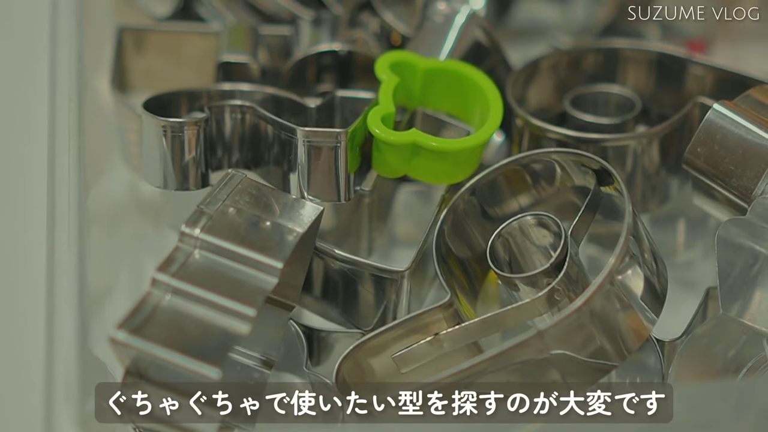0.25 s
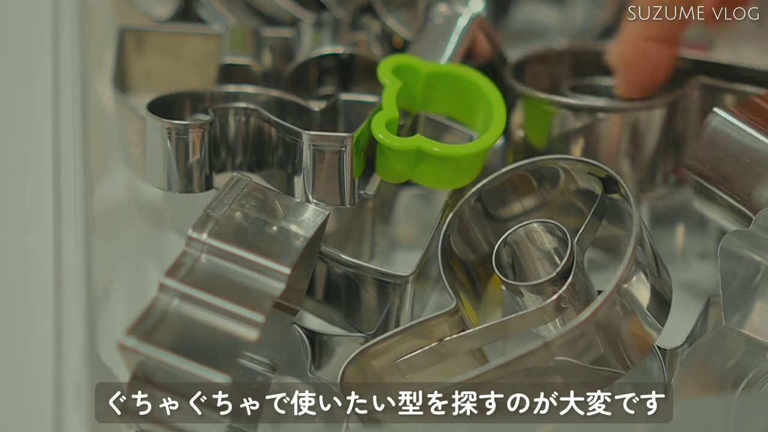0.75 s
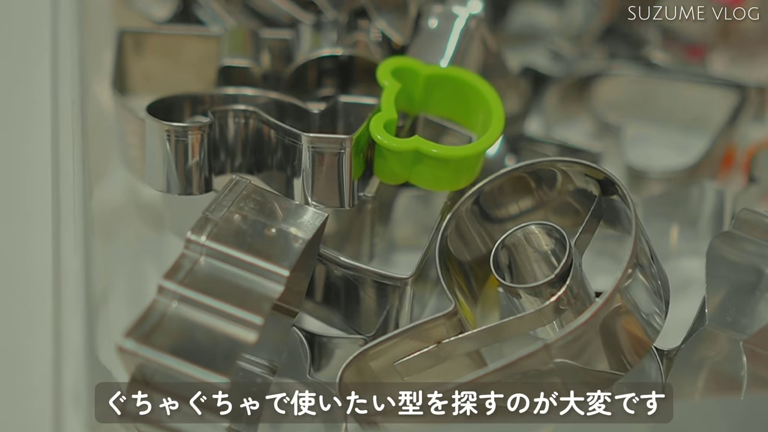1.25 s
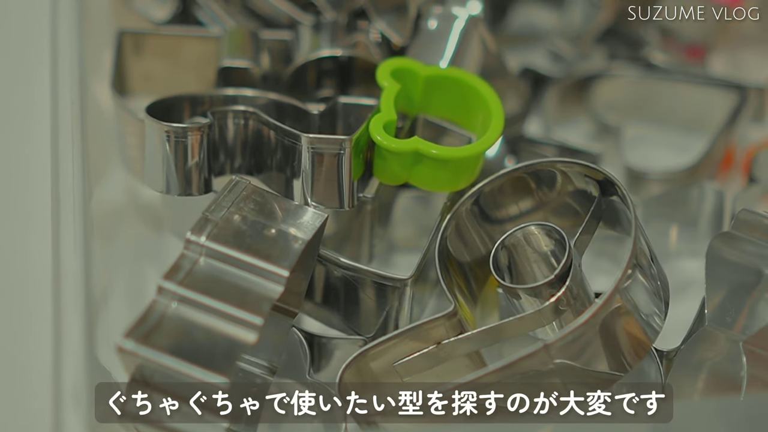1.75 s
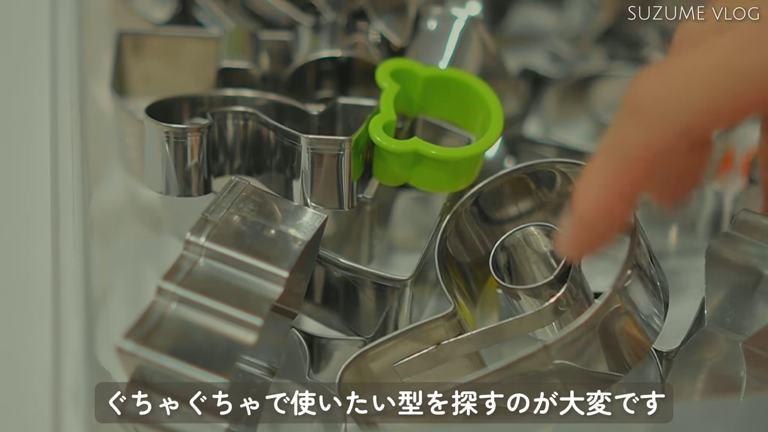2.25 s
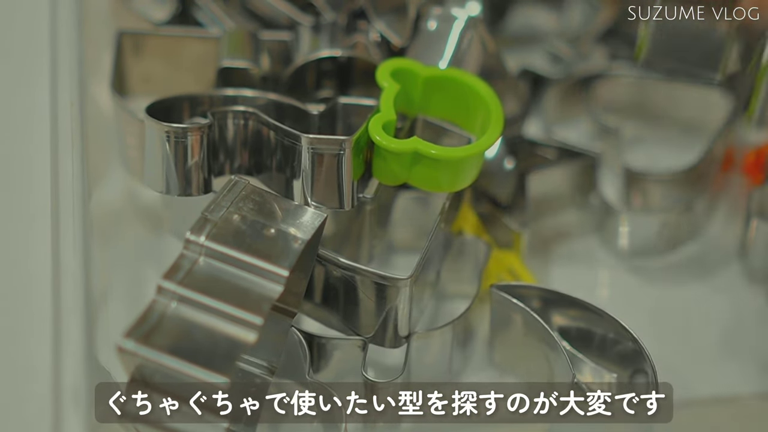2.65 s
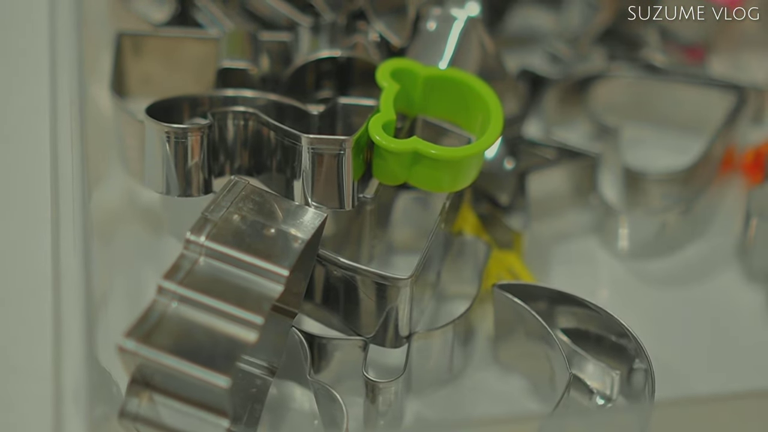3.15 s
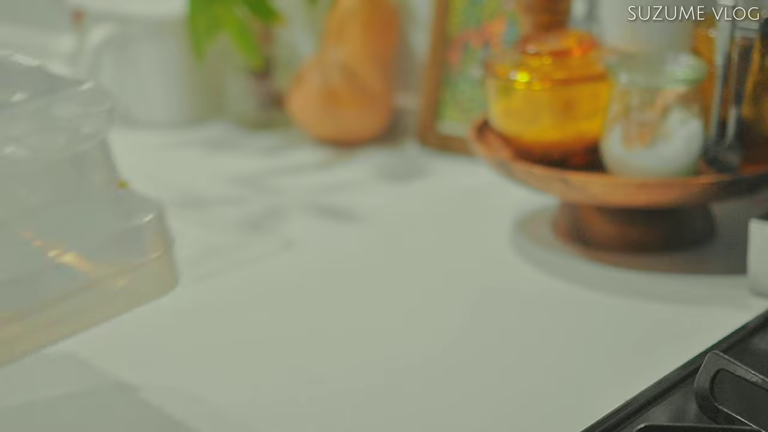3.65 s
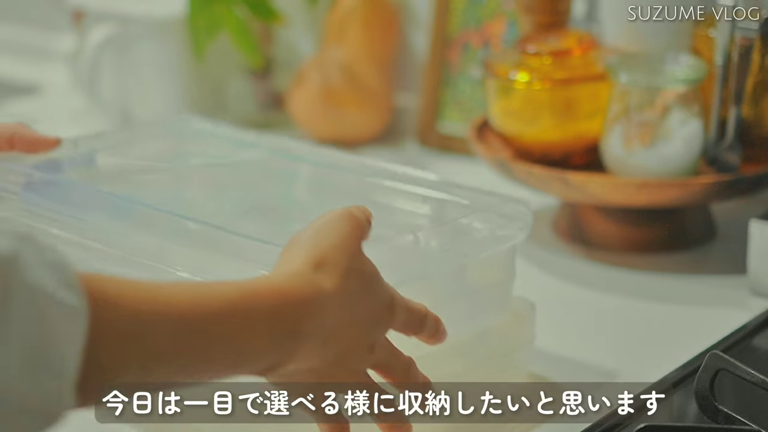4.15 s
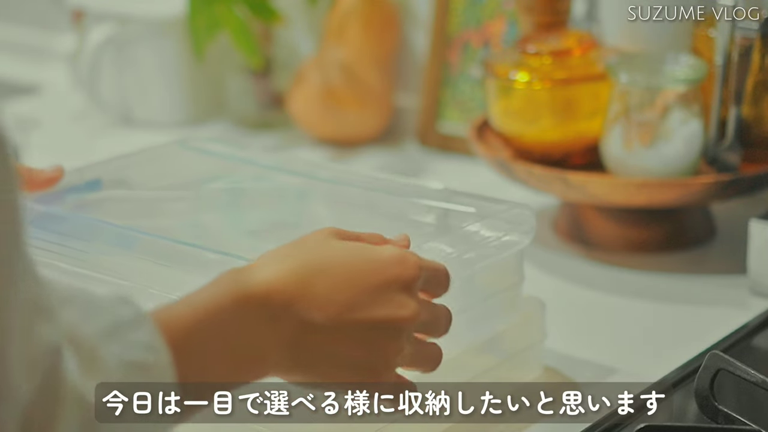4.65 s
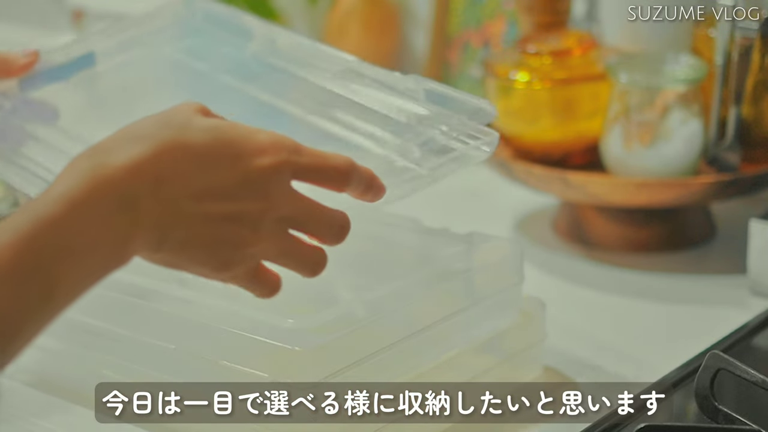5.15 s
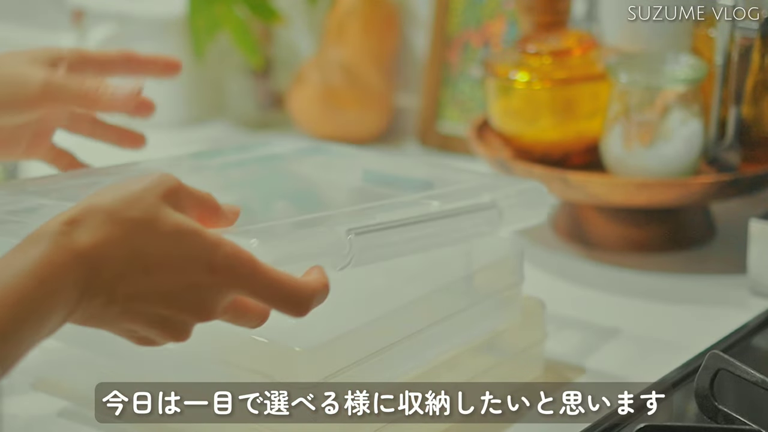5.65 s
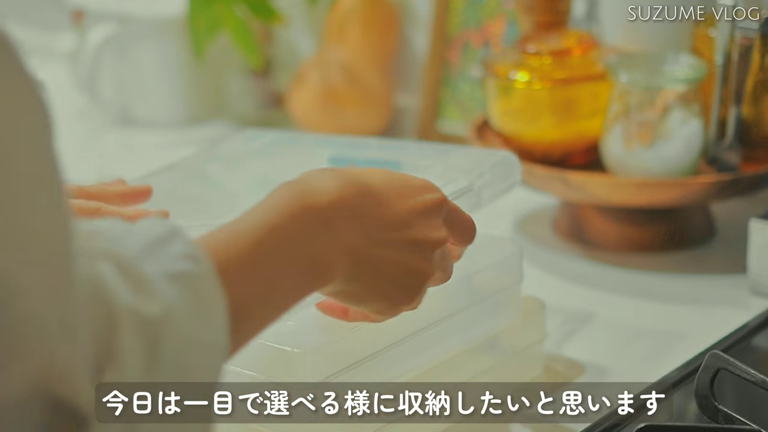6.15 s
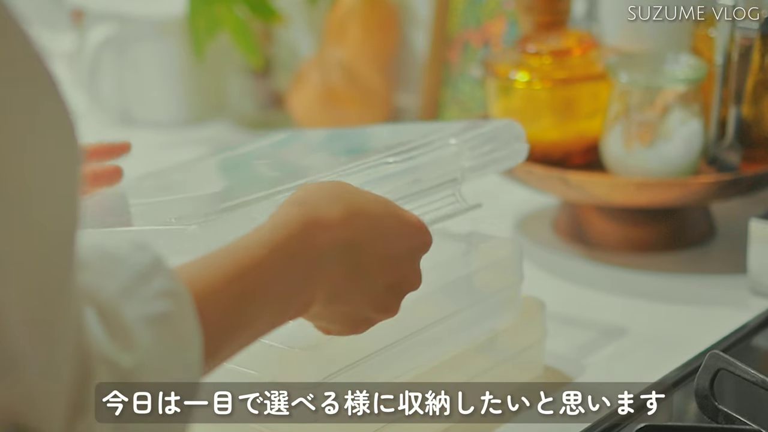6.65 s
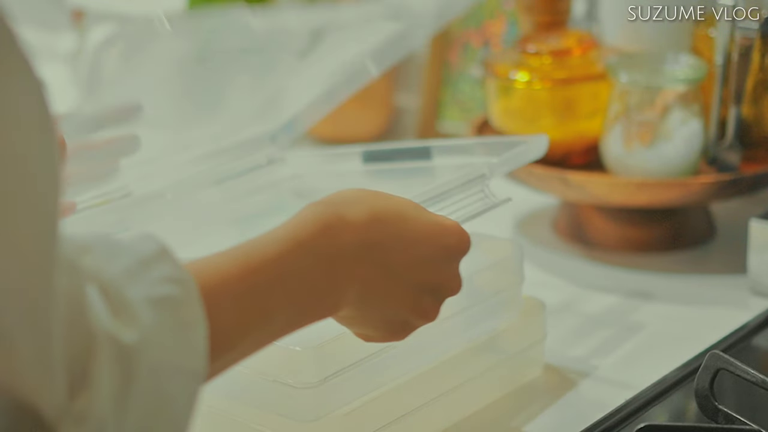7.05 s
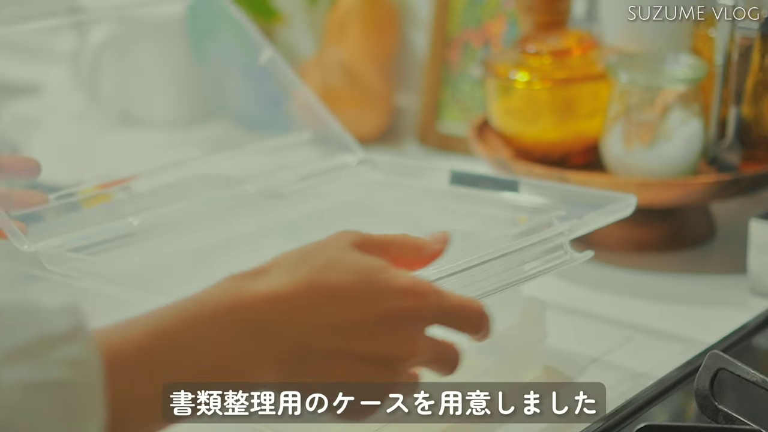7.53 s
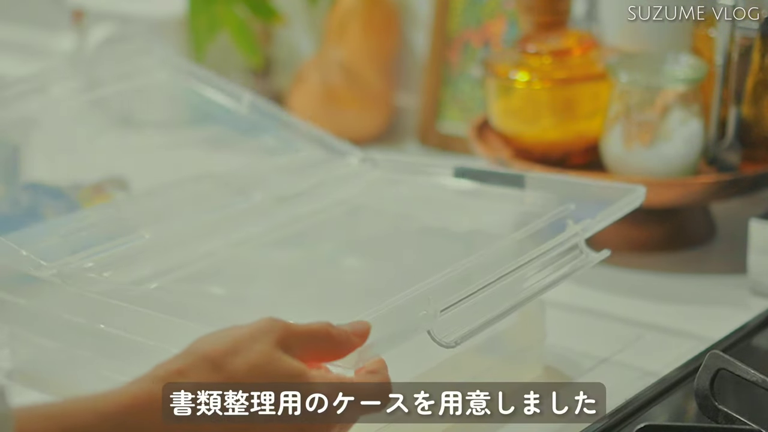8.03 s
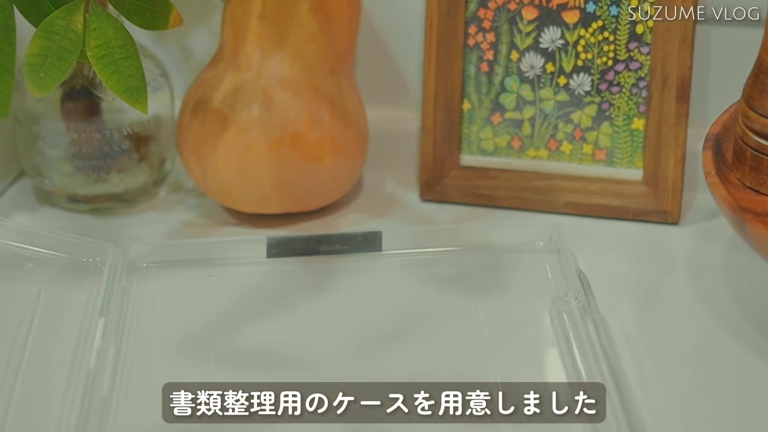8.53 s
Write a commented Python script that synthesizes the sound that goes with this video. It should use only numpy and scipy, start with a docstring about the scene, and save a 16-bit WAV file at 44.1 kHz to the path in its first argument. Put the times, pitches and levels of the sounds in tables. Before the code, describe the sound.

Bright metallic clatter of cookie cutters being picked from a heap, followed by hollow plastic case knocks, clicks and scuffs in a quiet kitchen.

```python
"""Steel clinks and jangles, then plastic knocks and snaps, then a quiet room: three scenes joined in a small hard kitchen.
A hand lifts thin steel cookie cutters out of a tangled heap in a plastic box; flat plastic cases are set down
on the counter, unstacked, unlatched and opened. Each contact makes a crack, dying noise bands and ringing modes.
The room is steady filtered noise, with two faint sines in the last scene; a thin microphone has little bass."""
import sys
import numpy as np
from scipy import signal
from scipy.io import wavfile
from scipy.ndimage import uniform_filter1d

SR = 44100
rng = np.random.default_rng(int(sys.argv[2]) if len(sys.argv) > 2 else 0)


def wav_record(signal):
    """Record a signal, one row per channel, as 16-bit PCM in the file named by sys.argv[1]."""
    frames = np.transpose(np.atleast_2d(signal))
    bounded = np.clip(frames, -1, 1)
    # unit amplitude maps onto the largest positive 16-bit level
    quanta = np.round(bounded * 32767).astype(np.int16)
    wavfile.write(sys.argv[1], SR, quanta)


def field_ratio(decibels):
    """Amplitude ratio for a level in dB (20 dB per decade); scalars and array-likes work."""
    return 10 ** (np.asarray(decibels, dtype=float) / 20)


N = 387618

# Steel collisions. Each row: time in seconds, strength in dB, lows re mids in dB, highs re mids in dB, note in Hz.
CLINKS = [(0.1353, -34, 5, -20, 3470), (0.2443, -36, -6, -25, 3420), (0.3204, -10, -25, -9, 5060),
          (0.355, -9, -38, -12, 4920), (0.3873, -17, -25, 6, 12200), (0.455, -14, -21, 2, 12100),
          (0.5198, -13.5, 2, -27, 5700), (0.5562, -10, -17, -32, 5500), (0.7123, -16, -4.5, 1, 6650),
          (0.7595, -7, -5, -19, 4840), (0.7926, -7, -46, -15, 5200), (0.8402, -8, -30, -17, 4750),
          (0.8722, -3.5, -3, -5.5, 7640), (0.9083, -12.5, -14, -1, 8900), (0.9496, -8, -14, -16, 3450),
          (0.965, -7, -6.5, -2, 4670), (1.0109, -9, -4, -11, 4750), (1.0303, -5.5, -14, -9, 5090),
          (1.132, -9, -14, -32, 4500), (1.1673, -11.5, -11.5, 2, 4650), (1.1954, -19.5, -24.5, 11.5, 11200),
          (1.2207, -13.5, -5, -41, 2064), (1.2414, -12.5, -3, -27, 2155), (1.287, -15.5, -10, -23, 1986),
          (1.5661, -20, -33, -18, 5650), (1.6132, -27.5, -15, -10, 5570), (1.6661, -28, -28, -10, 5800),
          (1.6806, -16.5, -10, -1.5, 5660), (1.6995, -9, -5.5, -8, 2196), (1.7235, -10.5, -22, -1, 4940),
          (1.759, -14, -5, 4, 6050), (1.8344, -10.5, -12, 1, 6420), (1.8894, -12.5, -6, -12, 6000),
          (1.907, -9.5, -1.5, -7, 4940), (2.0666, -27.5, -9, -6, 5040), (2.3491, -18, -9.5, -11, 5360),
          (2.3727, -11.5, -21, -19, 3990), (2.3814, -9, -13, -5, 4900), (2.4372, -3.5, -19, -21, 4156),
          (2.4844, -2.5, -36, -42, 4200), (2.5355, -3.5, -11.5, -14, 4090),
          (2.597, -7.5, -10.5, -8.5, 4210), (2.7125, -9.5, -23, -21, 3830), (2.72, -3.5, -15.5, -17, 5010),
          (2.7461, -12.5, -17, -1.5, 11700), (2.8481, -10.5, -17, -10.5, 5240),
          (2.9228, -2.5, -53, -12, 5800), (2.9465, -11.5, 2.5, -5.5, 2435), (2.9672, -6, -26, -9, 6500),
          (2.9907, -2.5, -35, -8, 5710), (3.043, 0.5, -44, -9, 13600), (3.0709, -3, -41, -12, 6790),
          (3.0983, -9, -33, -6, 4040), (3.1196, -6, -42, -0.5, 4110), (3.1487, -13.5, -41, 0.5, 7180),
          (3.2505, -13.5, -2.5, -2.5, 6460), (3.3026, -10, -17, -10, 2374), (3.3362, -13, -33, -6, 5230),
          (3.3566, -14, -12, 3.5, 6400)]
# Hand drags through the heap. Each row: start in seconds, length in seconds, first relative level in dB,
# last relative level in dB, brightness in dB.
STIRS = [(0.0, 0.014, -24, -21, -2.5), (0.317, 0.26, -12, -12, 0), (0.712, 0.01, -21, -26, 9),
         (0.757, 0.38, -11, -18, 2), (1.166, 0.033, -17, -9.5, 4.5), (1.222, 0.17, -42, -39, -6),
         (1.507, 0.06, -43, -33, 1), (1.655, 0.029, -30, -21.5, 8), (1.682, 0.11, -9.5, -16.5, 0.5),
         (1.838, 0.1, -10, -17.5, 1), (2.306, 0.046, -47, -34, -11), (2.371, 0.016, -27, -13, 4),
         (2.438, 0.18, -14.5, -18.5, 4), (2.703, 0.01, -17, -23, 0), (2.749, 0.1, -30, -25.5, -3.5),
         (2.944, 0.19, -15, -11, 0), (3.356, 0.03, -12.5, -15, 5.5)]
# Steel rattle colour in dB, settling in dB per second once let go, dulling in dB per dB settled.
STEEL_RATTLE = dict(lows_db=-8, highs_db=-6.5, settle_db_per_s=443, dulls=0.43)
# Modes of the cutters lifted before the pause. Each row: frequency in Hz, width in Hz, relative level in dB.
EARLY_CUTTER_MODES = [(1080, 36, -17.5), (1450, 630, -3), (2430, 43, 4), (2940, 32, -10), (3470, 380, 5.5),
                      (3730, 80, 4.5), (4740, 57, 8), (5570, 65, 8), (6180, 45, 1), (6500, 90, 6.5),
                      (7300, 180, 2.5), (8200, 27, -5), (9200, 300, -3), (11200, 99, -5), (11800, 100, 1.5),
                      (12200, 54, 1), (13900, 78, 3), (14200, 70, -1), (15200, 87, 2.5)]
# Modes of the cutters lifted after the pause. Each row: frequency in Hz, width in Hz, relative level in dB.
LATE_CUTTER_MODES = [(3320, 45, -14), (4050, 43, -6), (4900, 79, -24), (5700, 110, 4), (6400, 77, -13),
                     (6790, 91, -0.5), (8600, 49, -6), (8700, 64, -7), (9350, 55, -20), (9540, 270, -10),
                     (10100, 63, -18), (10900, 42, -39), (10900, 68, -17), (11500, 34, -39),
                     (11700, 46, -12), (12100, 170, -30), (12100, 36, -13), (12500, 40, -20),
                     (13700, 29, -13), (13600, 90, -24), (14700, 130, -20), (14370, 90, -14)]
# Modes of a cutter hanging free in the fingers. Each row: frequency in Hz, width in Hz, relative level in dB.
HELD_CUTTER_MODES = [(4140, 9, -17.5), (5800, 11, -16.5), (7060, 8.9, -19), (13390, 20, -32)]
# Modes of the plastic box. Each row: frequency in Hz, width in Hz, relative level in dB.
BOX_MODES = [(183, 10.7, -47.5), (320, 52, -37)]
# Span in which the held cutter is struck: start in seconds, end in seconds.
HELD_SPAN_S = [2.92, 3.16]
PAUSE_S = 2.27
# Spectrum of the steel. Each row: frequency in Hz, relative density in dB per Hz.
STEEL_SPECTRUM = [(71, -74), (120, -52), (177, -40), (241, -53), (295, -33), (463, -14), (643, -22.5),
                  (1430, -5), (2750, -7.5), (4060, -4.5), (10400, -9), (12300, -12), (16000, -24)]
# Decay of the dense steel modes. Each row: frequency in Hz, T60 in seconds.
STEEL_T60 = [(200, 0.29), (1000, 0.24), (4000, 0.24), (14000, 0.17)]

# Plastic knocks and snaps. Each row: time in seconds, strength in dB, lows re mids in dB, highs re mids in dB,
# note in Hz.
KNOCKS = [(3.484, -38.5, -34, -8, 1350), (3.8086, -40, -17, -19, 610), (4.13, -43, -18, -2, 3210),
          (4.2034, -11.5, -35, -10.5, 1333), (4.3529, -28.5, -24, -8, 1280), (4.4694, -34, -25, -12, 980),
          (4.5944, -40, -19, 0.5, 1260), (4.6766, -32, -24, -17, 920), (4.8584, -28.5, -25, -46, 1340),
          (4.8876, -33, -13, -22, 725), (4.9412, -19.5, -14.5, -19, 1010), (5.1954, -41, -8, -33, 600),
          (5.3921, -11, -30, -9.5, 1320), (5.4591, -6.5, -40, -27, 1340), (5.4744, -13, -27.5, -26, 1380),
          (5.6462, -2, -23.5, -16.5, 1630), (5.6886, -8.5, -31, -35, 1770), (5.7494, -17.5, -16, -25, 830),
          (5.8037, -17.5, -10.5, -8.5, 1280), (5.8343, -21, -25, -20, 1350), (5.878, -18.5, -14, -8.5, 880),
          (5.9733, -29, -18, -15, 1330), (6.0176, -33.5, -12, -9, 1290), (6.0544, -38.5, 0, -7, 654),
          (6.2312, -37, -11, -48, 1340), (6.3365, -30.5, -24, 2, 825), (6.3593, -31, -27, -35, 1450),
          (6.3974, -33.5, -23, -38.5, 860), (6.4914, -19, -29, -34, 1020), (6.5116, -22, -21, -5, 1630),
          (6.5645, -31, -15, -39, 644), (6.6055, -26, -30, -15, 1410), (6.6977, -13, -27, -26, 1374),
          (6.7594, -16, -16.5, -11.5, 872), (6.8273, -15.5, -35, -31, 1354), (6.7474, -32, -18, -19, 1340),
          (6.8986, -24, -30, -12, 1440), (6.9244, -23.5, -16, -23, 890), (7.1967, -36, -27, -15, 930),
          (7.225, -36.5, -9, -16, 855), (7.3633, -38.5, -19, -28, 1480), (7.6043, -35.5, -8, -10, 1450),
          (7.675, -30.5, -28, -16, 1260), (7.8253, -35, -23, -18, 980), (7.8421, -25.5, -28.5, -37, 1700),
          (8.0568, -38, -25, -37, 888), (8.2142, -28, -34, -12, 1270), (8.31, -31, -21, -8, 1460)]
# Scuffs of hands and cases. Each row: start in seconds, length in seconds, first relative level in dB,
# last relative level in dB, brightness in dB.
SCUFFS = [(4.21, 0.071, -22, -35, -2), (4.312, 0.09, -36.5, -36, -4), (4.396, 0.28, -37, -46, -12),
          (4.93, 0.2, -50, -46.5, -10), (5.66, 0.09, -14, -35.5, -2.5), (5.793, 0.18, -43, -42.5, 4),
          (6.499, 0.0065, -21, -28, -0.5), (6.525, 0.01, -26, -35, 0), (6.684, 0.23, -37.5, -52, -9),
          (7.228, 0.01, -38, -40.5, -7.5), (7.417, 0.28, -59, -45, 5), (7.847, 0.0077, -28.5, -34, 3),
          (8.148, 0.03, -47, -52, 10), (8.222, 0.13, -44, -42, -2.5), (8.306, 0.031, -45, -45.5, 0)]
# Plastic rattle colour in dB, settling in dB per second after a scuff, dulling in dB per dB settled.
PLASTIC_RATTLE = dict(lows_db=-14, highs_db=-6.5, settle_db_per_s=174, dulls=0.11)
# Modes of the case shells. Each row: frequency in Hz, width in Hz, relative level in dB.
CASE_MODES = [(860, 66, 2), (1340, 76, -37), (1630, 40, 1.5), (2670, 180, -41), (3440, 110, -2),
              (4400, 84, -5), (5090, 47, -37), (5710, 50, -4)]
# Modes of the worktop. Each row: frequency in Hz, width in Hz, relative level in dB.
COUNTER_MODES = [(201, 35, -30.5), (313, 53, -22)]
# Spectrum of the plastic. Each row: frequency in Hz, relative density in dB per Hz.
PLASTIC_SPECTRUM = [(71, -65), (120, -55), (192, -17), (370, -22), (535, -3), (874, -2.5), (1120, -2.5),
                    (1650, -1.5), (2530, -2), (4500, -4.5), (7200, -12), (15000, -21), (16000, -39)]
# Decay of the dense plastic modes. Each row: frequency in Hz, T60 in seconds.
PLASTIC_T60 = [(200, 0.06), (1000, 0.12), (4000, 0.1), (14000, 0.061)]

# Stereo likeness of struck things and room tail. Each row: frequency in Hz, left-right correlation.
STRUCK_LIKENESS = [(60, 0.985), (180, 1), (550, 0.98), (1650, 0.97), (4970, 0.78), (15000, 0.093)]
# Stereo likeness of the hiss. Each row: frequency in Hz, left-right correlation.
HISS_LIKENESS = [(60, 0.92), (240, 0.81), (950, 0.63), (3770, 0.5), (15000, 0.061)]
# Stereo balance. Each row: frequency in Hz, left minus right in dB.
BALANCE = [(60, 6), (180, 1.5), (550, 1.5), (1650, 1), (4970, 0), (15000, 0)]
# Decay of the kitchen. Each row: frequency in Hz, T60 in seconds.
ROOM_T60 = [(200, 0.46), (1000, 0.45), (4000, 0.46), (14000, 0.36)]
# Faint appliance tones. Each row: frequency in Hz, relative level in dB.
WHINES = [(3250, -66), (14800, -74)]
# Spectrum of the hiss. Each row: frequency in Hz, relative density in dB per Hz.
HISS_SPECTRUM = [(24, -71), (40, -39), (167, -21), (199, -19), (283, -11.5), (422, -6.5), (479, -5),
                 (1950, -0.5), (2150, 1.5), (2570, -8), (3300, -4), (14800, -18.5), (16000, -24)]
# Hiss level of each scene in dB.
HISS_DB = [-48, -47.5, -48.5]
# Gain of each scene's action in dB, added on the left and taken off on the right.
SCENE_LEAN_DB = [-0.93, -0.2, .6]
# Times of the two joins in seconds.
JOINS_S = [3.374, 8.354]
FADE_OUT_S, FADE_IN_S = 0.0013, 0.027
BAND_EDGES_HZ = 30 * 2 ** np.arange(0, 9.3, .5)   # half octaves


def cutters():
    """Thin steel bands jostle: clinks over a fast uneven rattle; the box booms faintly under them."""
    touch = contacts(CLINKS, STIRS, per_s=380, spread_db=3.0, rattle_db=-11, **STEEL_RATTLE)
    pivots_hz = [900, 4000, 12000]
    time_s = touch[0] / SR
    late = time_s > PAUSE_S
    free = (time_s > HELD_SPAN_S[0]) & (time_s < HELD_SPAN_S[1])

    early_touch = [column[~late] for column in touch]
    late_touch = [column[late] for column in touch]
    free_touch = [column[free] for column in touch]
    early = ringing(early_touch, EARLY_CUTTER_MODES, pivots_hz, luck_db=5, scatter_db=0.5)
    late_ring = ringing(late_touch, LATE_CUTTER_MODES, pivots_hz, luck_db=8, scatter_db=2.5)
    held = ringing(free_touch, HELD_CUTTER_MODES, pivots_hz, luck_db=2, scatter_db=1)

    heap = scattered_modes(STEEL_SPECTRUM, count=140, low_hz=892.5, high_hz=15825,
                           low_width_hz=45, high_width_hz=85)
    jingle = ringing(touch, heap, pivots_hz, luck_db=9, scatter_db=2.0)
    box = ringing(touch, BOX_MODES, pivots_hz, luck_db=3, scatter_db=.3)
    body = clatter(touch, STEEL_SPECTRUM, STEEL_T60, pivots_hz, rise_cycles=8.5, crack_db=16, colour_db=4)
    notes = pings(CLINKS, t60_s=0.069, level_db=-6.5, high_db=-3, high_hz=6600, split=0.003)

    rings = field_ratio(-21) * jingle + field_ratio(-20.5) * early + field_ratio(-17) * late_ring + held + notes
    return field_ratio(-4.5) * body + radiated(rings, low_hz=640) + radiated(box, low_hz=143)


def cases():
    """Stiff plastic shells knock, snap and scuff; the worktop thuds under them."""
    touch = contacts(KNOCKS, SCUFFS, per_s=700, spread_db=2.5, rattle_db=-11.5, **PLASTIC_RATTLE)
    pivots_hz = [380, 2000, 8000]
    body = clatter(touch, PLASTIC_SPECTRUM, PLASTIC_T60, pivots_hz, rise_cycles=1.0, crack_db=17, colour_db=2.5)
    shell = ringing(touch, CASE_MODES, pivots_hz, luck_db=4, scatter_db=.8)
    panels = scattered_modes(PLASTIC_SPECTRUM, count=40, low_hz=484, high_hz=6100,
                             low_width_hz=42, high_width_hz=86)
    hollow = ringing(touch, panels, pivots_hz, luck_db=5, scatter_db=1.5)
    counter = ringing(touch, COUNTER_MODES, pivots_hz, luck_db=3, scatter_db=.3)
    notes = pings(KNOCKS, t60_s=0.076, level_db=-10.5, high_db=-3, high_hz=2500, split=0.15)

    rings = field_ratio(-15.0) * shell + field_ratio(-20.5) * hollow + notes
    return field_ratio(3) * body + radiated(rings, low_hz=437) + radiated(counter, low_hz=140)


def contacts(hits, strokes, per_s, spread_db, rattle_db, lows_db, highs_db, settle_db_per_s, dulls):
    """Listed hits plus random rattle that dies and dulls after each stroke: (sample, dB, lows dB, highs dB)."""
    chance = rng.random(N)
    size_db = spread_db * np.minimum(rng.exponential(1, N), 4)
    at = np.flatnonzero(chance < per_s / SR)

    start, length, first, last, bright = np.transpose(strokes)[:, :, None]
    since = at / SR - start
    settled = settle_db_per_s * np.maximum(since - length, 0)
    progress = np.clip(since / np.maximum(length, 1e-3), 0, 1)
    level = first + (last - first) * progress - settled
    level = np.where(since < 0, -np.inf, level)

    # the loudest stroke drives each rattle contact
    loudest = level.argmax(axis=0), np.arange(len(at))
    tilt = (bright - dulls * settled)[loudest]
    stroke_db = level[loudest]
    rattle = np.transpose([at, stroke_db + rattle_db + size_db[at], lows_db - tilt, highs_db + tilt])
    rattle = rattle[stroke_db > -70]   # fainter ones are dropped

    blows = [(round(s * SR), db, lows, highs) for s, db, lows, highs, _ in hits]
    at, *columns = np.transpose([*rattle, *blows])
    return at.astype(int), *columns


def tilted(touch, hz, pivots_hz):
    """Click train as felt at one frequency: each contact's own lows and highs weight it away from the mids."""
    at, level, lows, highs = touch
    place = np.interp(np.log(hz), np.log(pivots_hz), [-1, 0, 1])
    side = lows if place < 0 else highs
    train = np.zeros(min(N, at.max() + SR))
    train[at] = field_ratio(level + abs(place) * (side - np.median(side)))
    return train


def clatter(touch, spectrum, t60s, pivots_hz, rise_cycles, crack_db, colour_db):
    """A bare crack, then modes too dense to tell apart: noise that dies by band, coloured anew by each contact."""
    out = np.zeros((2, N))
    flip = rng.choice([-1, 1], N)
    luck = field_ratio(colour_db * rng.standard_normal(N))
    for k, (hz, band, noise) in enumerate(noise_bands(STRUCK_LIKENESS)):
        train = tilted(touch, hz, pivots_hz) + 1e-9
        n = len(train)
        struck = train * np.roll(luck, 977 * k)[:n]   # other luck in each band
        decay = field_ratio(-120 / (at_hz(t60s, hz) * SR))   # of power, per sample
        power = signal.lfilter([1], [1, -decay], struck ** 2)
        lag = np.exp(-hz / (rise_cycles * SR))   # lows take longer to build up
        swell = signal.lfilter([1 - lag], [1, -lag], np.sqrt(power))
        crack = field_ratio(crack_db) * signal.sosfilt(band, train * flip[:n])
        out[:, :n] += field_ratio(at_hz(spectrum, hz)) * (swell * noise[:, :n] + crack)
    return out


def ringing(touch, modes, pivots_hz, luck_db, scatter_db):
    """Every contact strikes each damped mode with a strength and sign of its own."""
    out = np.zeros((2, N))
    luck = field_ratio(luck_db * rng.standard_normal(N)) * rng.choice([-1, 1], N)
    for k, (hz, width_hz, level_db) in enumerate(modes):
        clicks = tilted(touch, hz, pivots_hz)
        clicks[touch[0]] *= luck[(touch[0] + 977 * k) % N]
        lean_db = at_hz(BALANCE, hz) / 2 + scatter_db * rng.standard_normal()
        t60_s = np.log(1000) / (np.pi * width_hz)
        sides = field_ratio([[level_db + lean_db], [level_db - lean_db]])
        out[:, :len(clicks)] += ring(clicks, hz, t60_s) * sides
    return out


def scattered_modes(spectrum, count, low_hz, high_hz, low_width_hz, high_width_hz):
    """Many loose pieces: modes scattered over the range, damped more in the treble."""
    share = (np.arange(count) + rng.random(count)) / count
    hz = low_hz + (high_hz - low_hz) * share ** 1.3
    width_hz = low_width_hz + (high_width_hz - low_width_hz) * share
    width_hz = width_hz * field_ratio(2.4 * rng.standard_normal(count))
    return zip(hz, width_hz, at_hz(spectrum, hz))


def pings(hits, t60_s, level_db, high_db, high_hz, split):
    """Each blow sounds its piece's own note with a weaker, shorter partner, close for steel, wider for plastic."""
    out = np.zeros(N + SR)
    click = np.eye(1, SR // 2)[0]
    luck = rng.uniform(-0.32, 1, N)
    for s, strength_db, _, highs_db, hz in hits:
        i = round(s * SR)
        # high notes follow the blow's treble
        db = strength_db + (high_db + highs_db if hz > high_hz else level_db)
        note = ring(click, hz, t60_s)
        partner = ring(click, hz * (1 + split * luck[i]), t60_s / 2)
        out[i:i + SR // 2] += field_ratio(db) * (note + 0.35 * partner)
    return out[:N]


def ring(clicks, hz, t60_s):
    """Two-pole resonator: a unit click sets a sine of height about 1 ringing."""
    r = field_ratio(-60 / (t60_s * SR))
    w = 2 * np.pi * hz / SR
    return signal.lfilter([0, np.sin(w)], [1, -2 * r * np.cos(w), r * r], clicks + 1e-18)


def radiated(x, low_hz):
    """Small things move little air below their lowest mode: a high-pass."""
    return signal.sosfilt(signal.butter(4, low_hz, "high", fs=SR, output="sos"), x)


def kitchen(x):
    """Adds the room's tail: noise that dies band by band, starting with the first wall."""
    t = np.arange(SR) / SR
    tail = sum(band[:, :SR] * field_ratio(-60 * t / at_hz(ROOM_T60, hz)) for hz, _, band in noise_bands(STRUCK_LIKENESS))
    tail = tail * (t > .004) / np.sqrt(np.sum(tail ** 2) / 2)
    mono = x.mean(axis=0)[None]
    return x + field_ratio(-9.0) * signal.fftconvolve(tail, mono, axes=1)[:, :N]


def whine():
    """Faint appliance tones: steady sines."""
    t = np.arange(N) / SR
    return sum(np.sqrt(2) * field_ratio(db) * np.sin(2 * np.pi * hz * t) for hz, db in WHINES)


def hiss():
    """Steady air and appliance noise: shaped noise bands, rms 1."""
    out = sum(field_ratio(at_hz(HISS_SPECTRUM, hz)) * band for hz, _, band in noise_bands(HISS_LIKENESS))
    return out / np.sqrt(np.mean(out ** 2))


def noise_bands(likeness):
    """Half-octave bands of white stereo noise as (centre Hz, filter, left and right)."""
    white = rng.standard_normal((2, 2, N))
    for k, (low, high) in enumerate(zip(BAND_EDGES_HZ, BAND_EDGES_HZ[1:])):
        band = signal.butter(2, [low, high], "band", fs=SR, output="sos")
        mid, side = signal.sosfilt(band, white[k % 2])   # neighbours share no noise
        hz = np.sqrt(low * high)
        alike = np.clip(at_hz(likeness, hz), 0, 1)
        lean = field_ratio(at_hz(BALANCE, hz) / 2 * np.array([[1], [-1]]))
        yield hz, band, lean * (np.sqrt(1 + alike) * mid + np.sqrt(1 - alike) * side * [[1], [-1]])


def at_hz(points, hz):
    """Reads a table along log frequency."""
    table_hz, values = np.transpose(points)
    return np.interp(np.log(hz), np.log(table_hz), values)


def scene():
    """Three scenes in turn: at each join one fades out quickly while the next fades in."""
    t = np.arange(N) / SR
    air = hiss()
    actions = [kitchen(cutters()), kitchen(cases()), whine()]
    starts, ends = [-1, *JOINS_S], [*JOINS_S, 10]   # outer bounds lie outside the sound
    out = 0
    for action, hiss_db, lean_db, start, end in zip(actions, HISS_DB, SCENE_LEAN_DB, starts, ends):
        fade_in = np.clip((t - start) / FADE_IN_S, 0, 1)
        fade_out = np.clip((end - t) / FADE_OUT_S + 1, 0, 1)
        leaned = field_ratio([[lean_db], [-lean_db]]) * action
        out = out + fade_in * fade_out * (leaned + field_ratio(hiss_db) * air)
    return out


def limiter(x, over_db, share, attack_s, release_db_per_s):
    """Turns loud passages down; the first instant of a blow slips through before it acts."""
    fall = release_db_per_s * np.arange(N) / SR
    power = uniform_filter1d(np.max(x ** 2, axis=0), size=64, origin=31)   # trailing window
    level_db = 10 * np.log10(power + 1e-12)
    held_db = np.maximum.accumulate(level_db + fall) - fall
    r = np.exp(-1 / (attack_s * SR))
    cut_db = signal.lfilter([1 - r], [1, -r], share * np.maximum(held_db - over_db, 0))
    return x * field_ratio(-cut_db)


def low_pass(x):
    """Removes everything above the highest recorded frequency."""
    return signal.sosfilt(signal.butter(12, 16830, fs=SR, output="sos"), x)


def record(dry):
    """Thin microphone: a limiter levels the clatter, peaks are rounded, bass is cut."""
    even = limiter(dry, over_db=-12, share=0.41, attack_s=0.00011, release_db_per_s=193)
    rounded = 1.153 * np.tanh(even / 1.107)
    thin = signal.sosfilt(signal.butter(2, 110, "high", fs=SR, output="sos"), rounded)
    return low_pass(thin)


dry = scene()
out = record(dry)
wav_record(out)
```